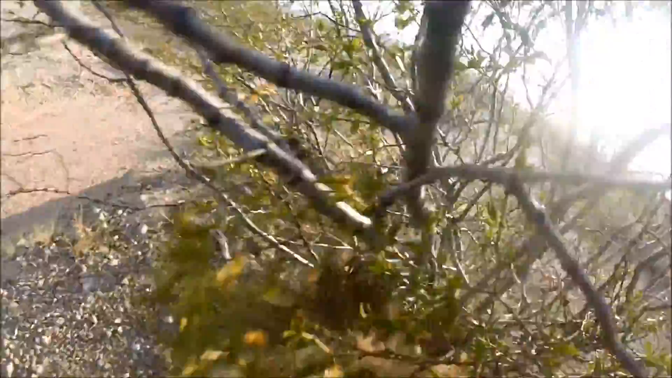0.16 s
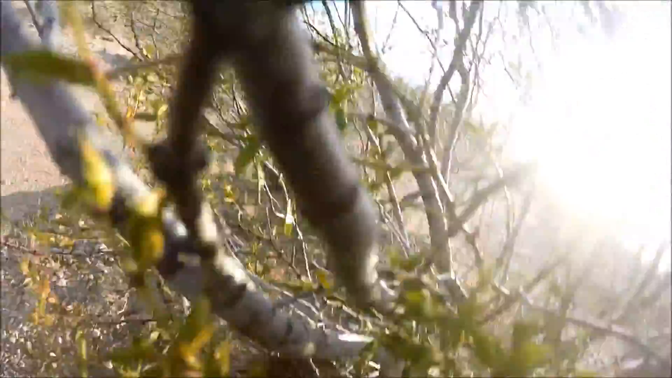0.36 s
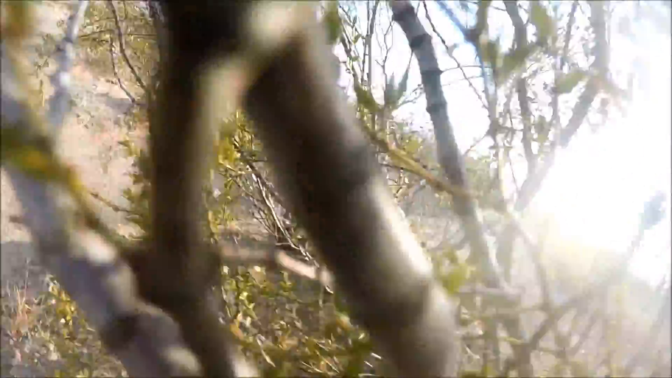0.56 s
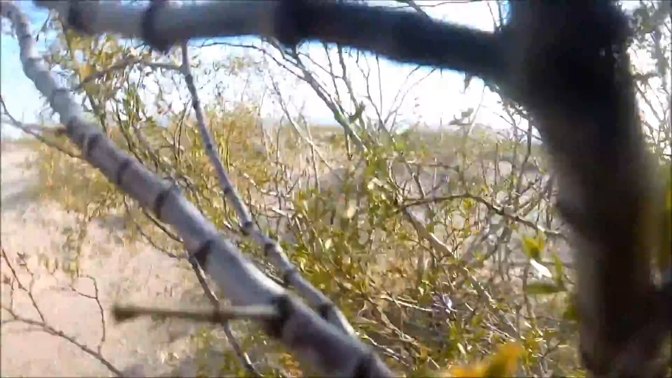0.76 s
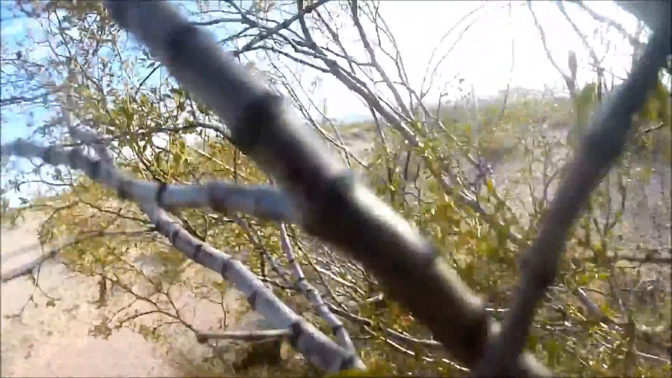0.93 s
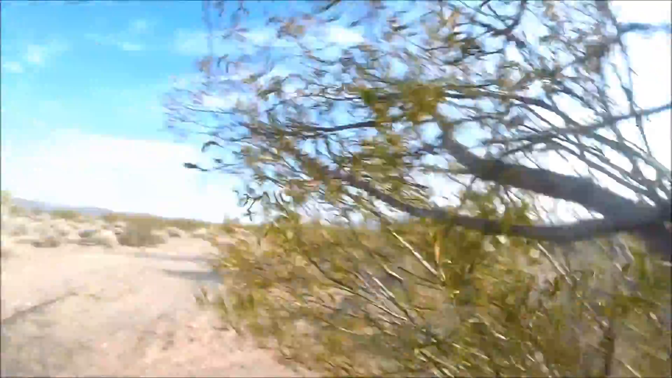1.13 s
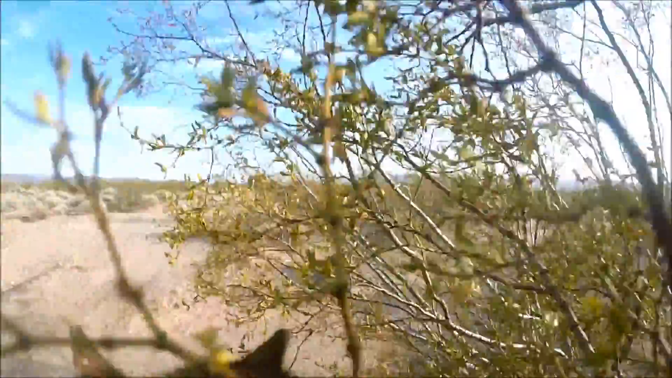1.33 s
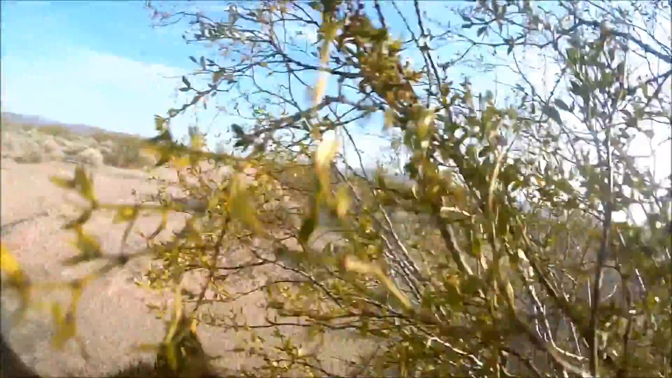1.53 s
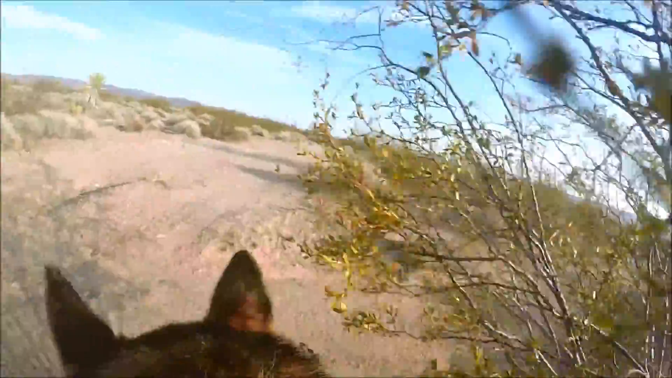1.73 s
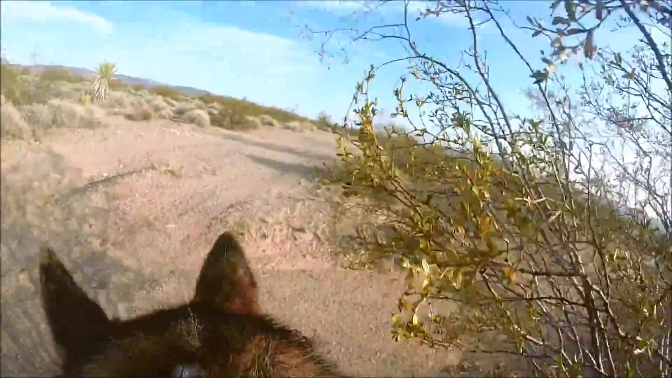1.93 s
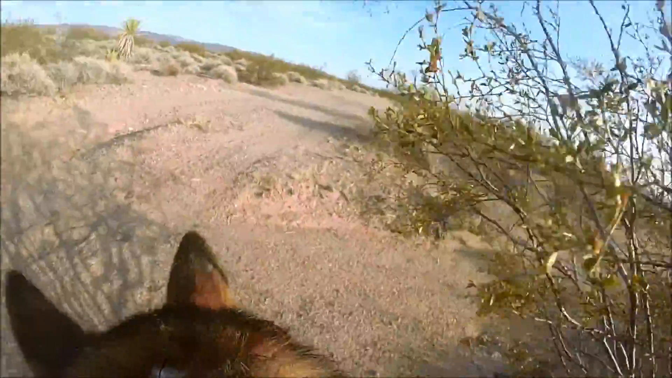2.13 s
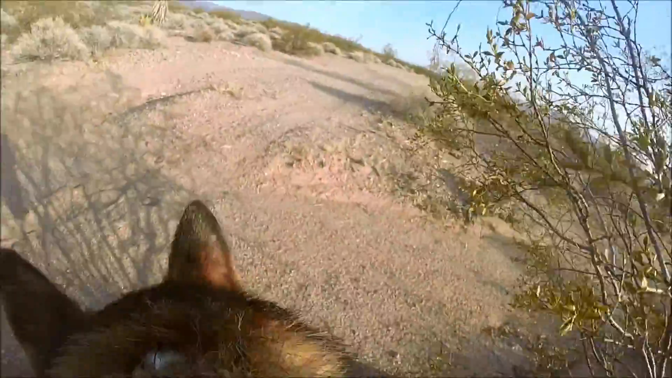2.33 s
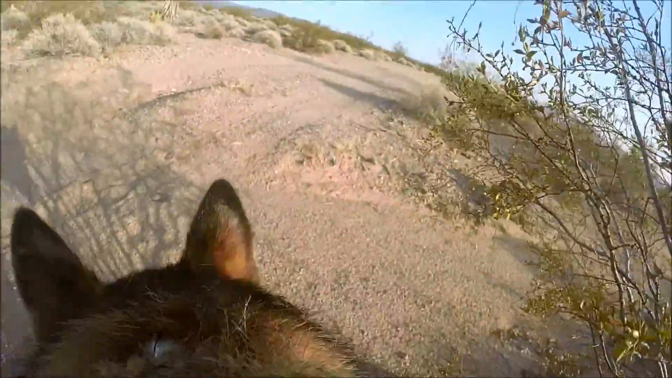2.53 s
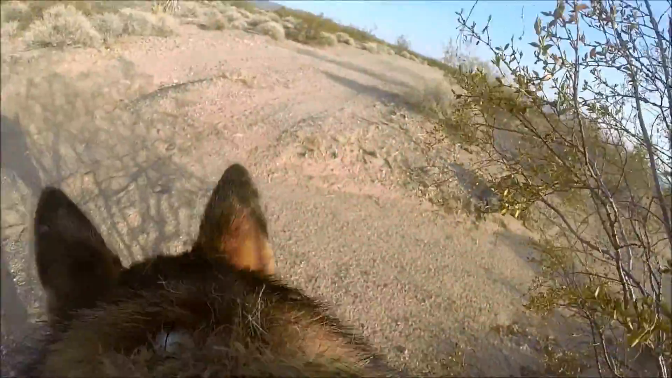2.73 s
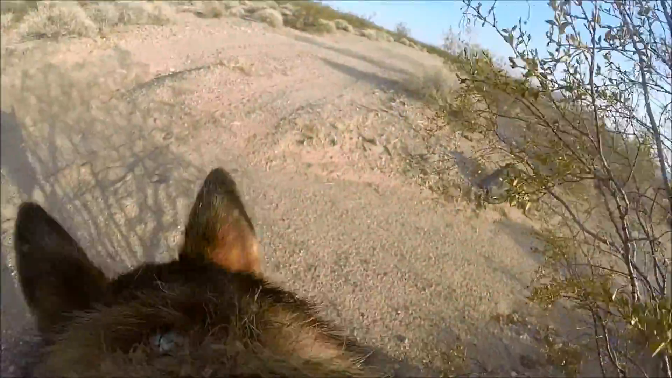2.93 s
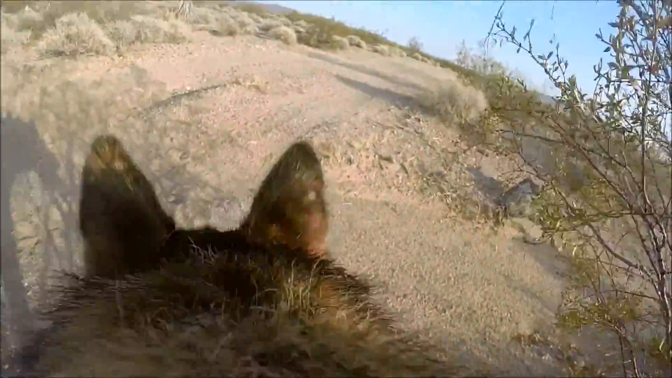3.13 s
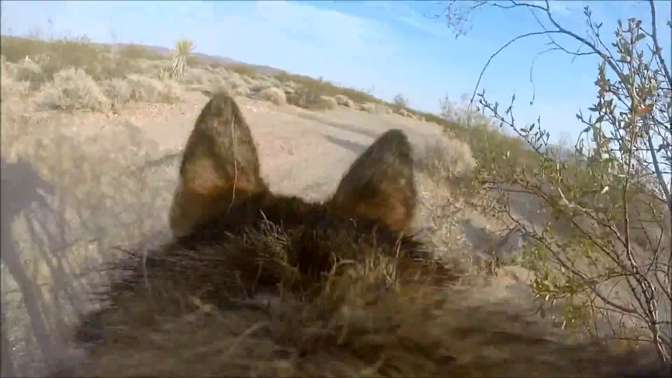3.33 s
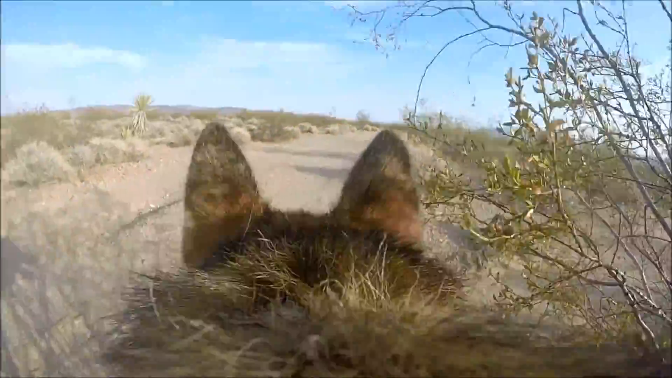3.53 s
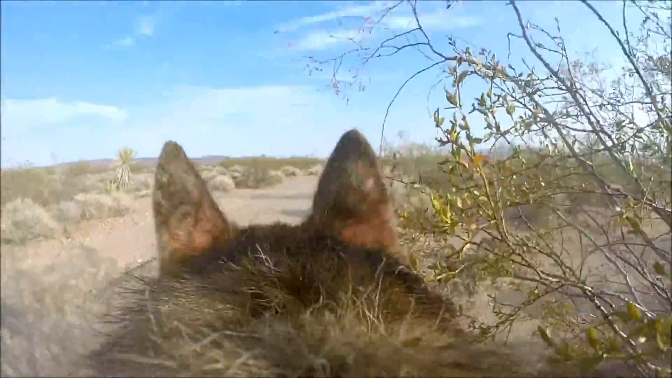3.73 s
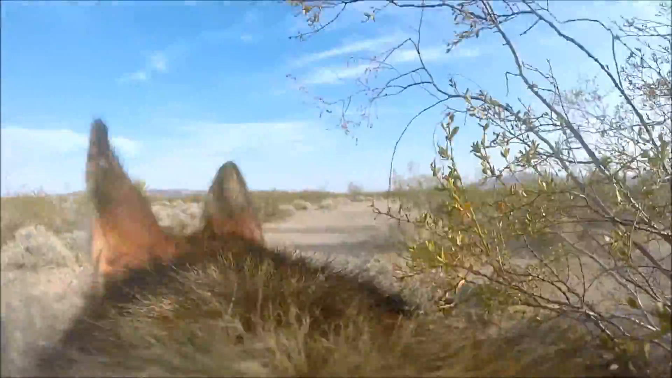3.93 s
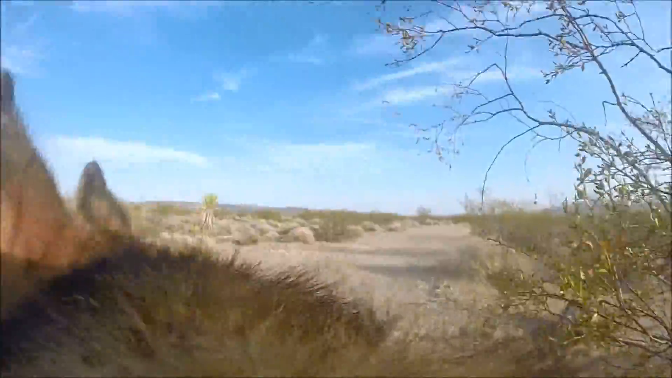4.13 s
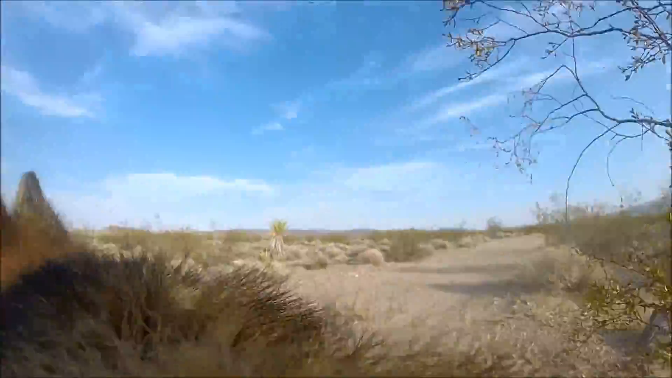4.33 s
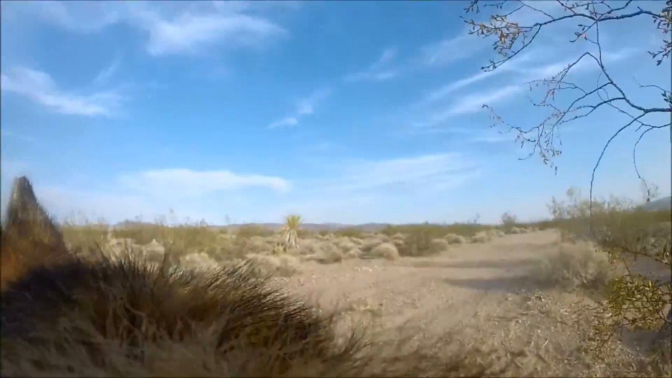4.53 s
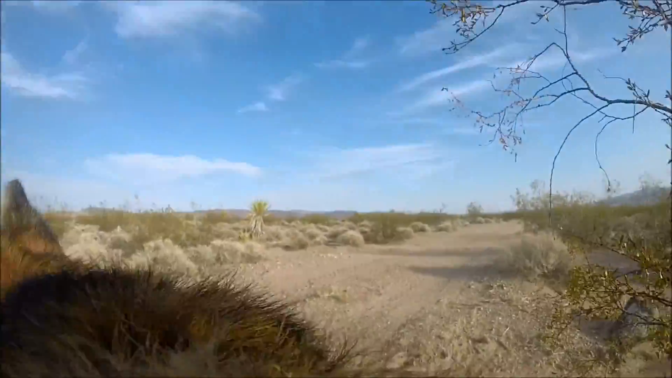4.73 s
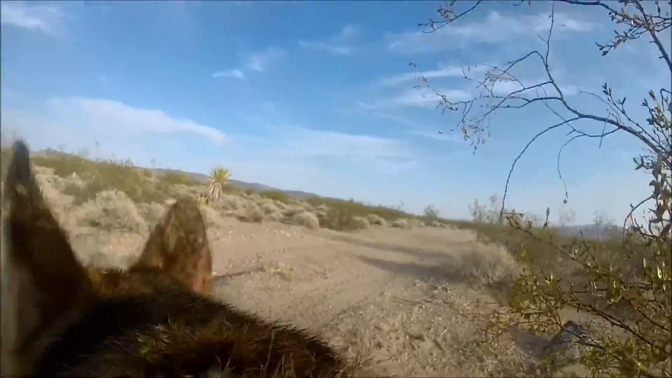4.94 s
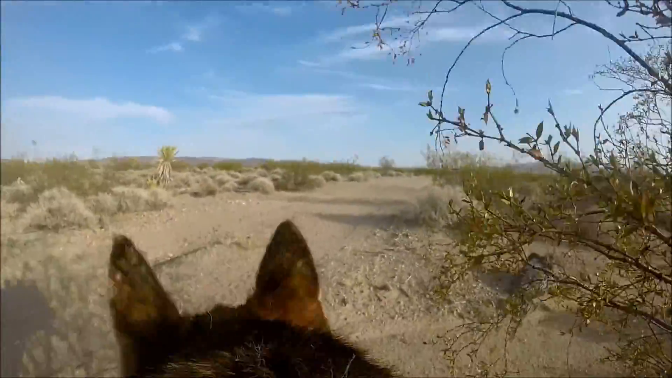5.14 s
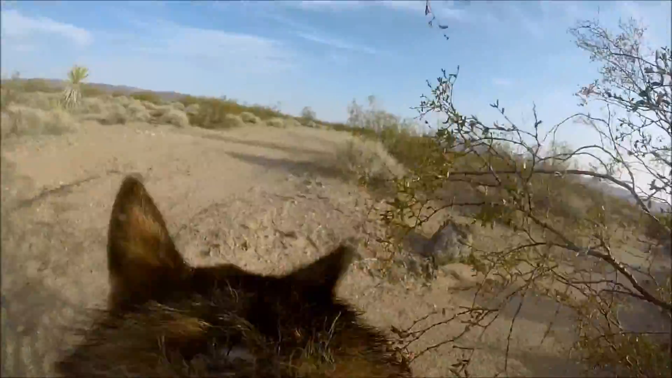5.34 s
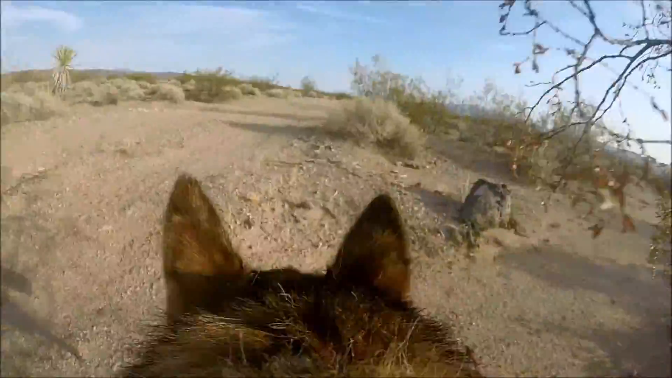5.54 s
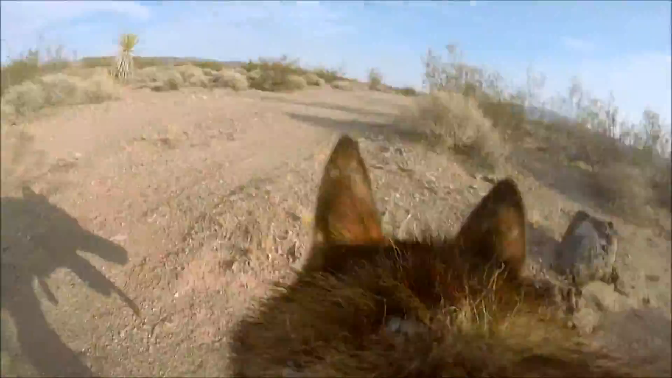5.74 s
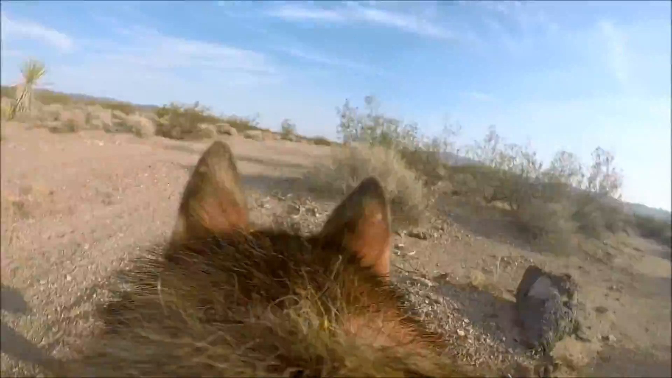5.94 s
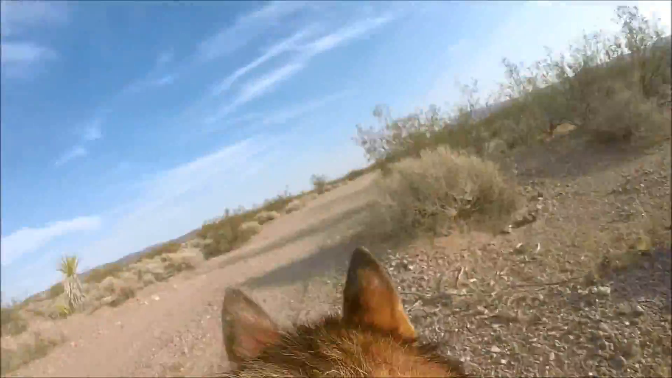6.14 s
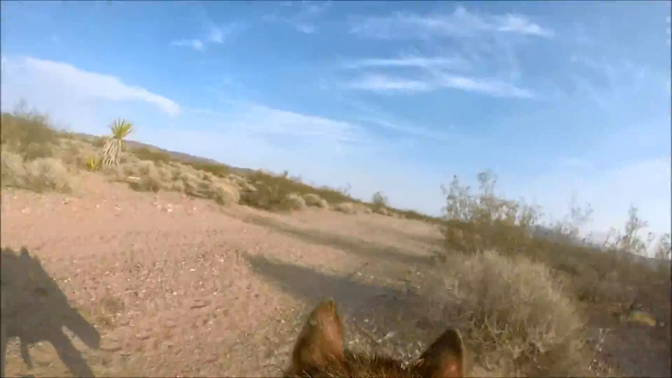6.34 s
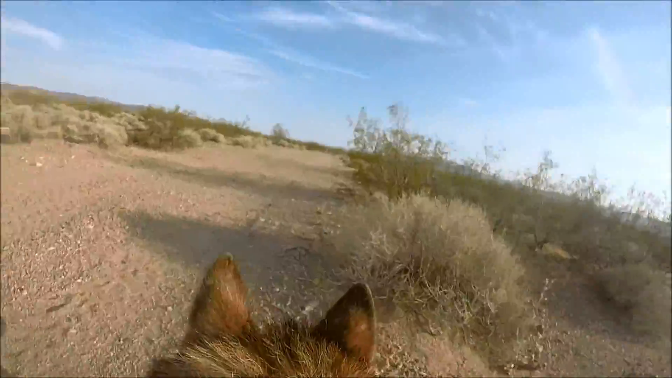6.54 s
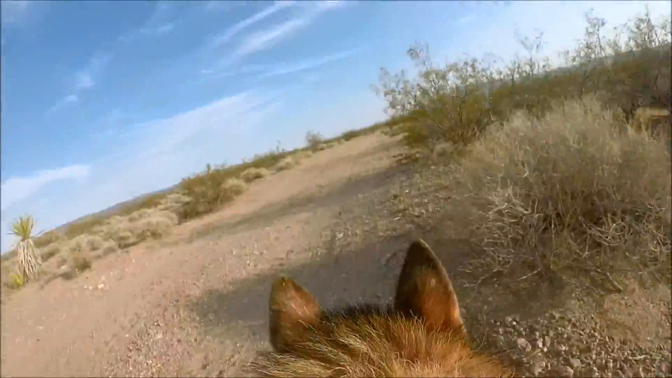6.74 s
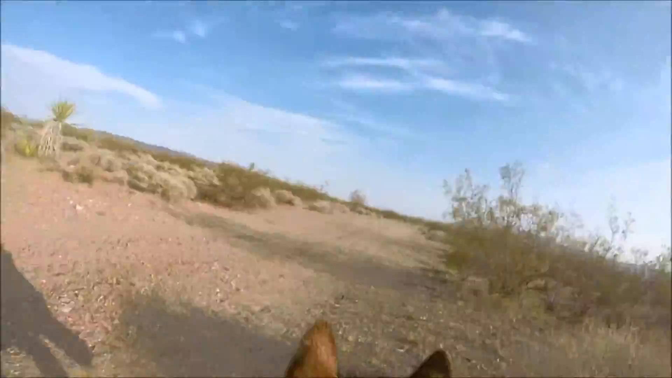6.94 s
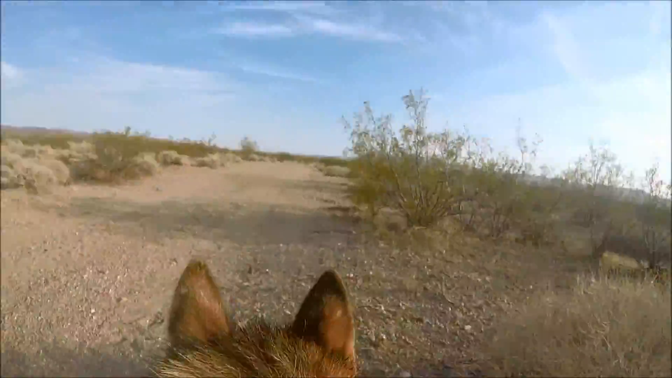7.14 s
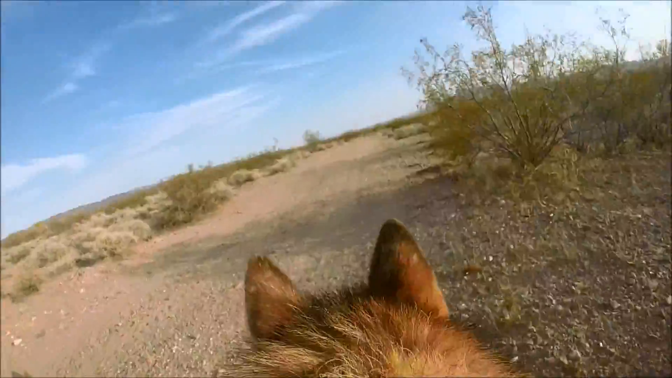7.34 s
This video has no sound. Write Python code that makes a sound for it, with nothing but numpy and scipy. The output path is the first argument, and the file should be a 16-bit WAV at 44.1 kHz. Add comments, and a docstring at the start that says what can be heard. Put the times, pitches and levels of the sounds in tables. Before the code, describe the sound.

Twigs scrape and snap loudly against a camera on a dog's back, then soft fur rustle, paw steps and hard knocks as it trots off.

```python
"""Desert bush from a dog's back

A dog carries a camera through a desert bush, then walks and finally trots off over gravel; all is heard
close, at the microphone in the housing. Twigs scrape and snap by stick-slip, leaves patter, freed twigs ring.
Hair clicks, straps, grit ticks and paw scuffs are coloured noise; the knocking mount rings in its own modes.
Swelling low rumble jostles the camera. A few more twigs scrape past late on."""
import sys
import numpy as np
from scipy import signal
from scipy.io import wavfile
from scipy.ndimage import uniform_filter1d

SR = 44100
rng = np.random.default_rng(int(sys.argv[2]) if len(sys.argv) > 2 else 0)


def digitize_waveform(pressure):
    """Quantize a signal to 16-bit integers and store it at the path in sys.argv[1].

    Rows of a 2-D input are taken as channels; values are limited to [-1, 1].
    """
    field = np.atleast_2d(pressure).T
    bounded = np.clip(field, -1, 1)
    quanta = np.round(bounded * 32767).astype(np.int16)
    wavfile.write(sys.argv[1], SR, quanta)


N = 329868  # length in samples

# Twigs dragged over the housing; levels are before each layer's trim, chatter is low for thick wood.
# Each row: start in seconds, end in seconds, scrape in dB, thud in dB, fizz in dB, chatter pitch in Hz.
TWIG_DRAGS = [(0.0, 0.067, -29, -33.5, -34.5, 1280), (0.056, 0.247, -35.5, -40.5, -48, 1290),
              (0.251, 0.293, -18.5, -29, -33, 2600), (0.298, 0.332, -19, -24, -32, 1200),
              (0.337, 0.378, -21.5, -28.5, -31, 2440), (0.382, 0.578, -30, -34, -41, 2470),
              (0.581, 0.762, -26.5, -30, -37.5, 2620), (0.764, 0.917, -27, -28, -40, 1270),
              (0.923, 1.051, -25.5, -27.5, -37.5, 2400), (1.063, 1.233, -22, -28.5, -29, 2400),
              (1.339, 1.428, -30.5, -34.5, -40, 2450), (1.413, 1.551, -28, -34, -46, 2500),
              (1.548, 1.65, -36.5, -32.5, -54.5, 2020), (1.686, 1.798, -38.5, -34, -59, 1330),
              (2.001, 2.091, -43.5, -59, -46, 2460), (5.192, 5.327, -29.5, -56, -34.5, 2760)]
# Colour of bark on the housing, before its resonances. Each row: frequency in Hz, density in dB per Hz.
BARK_TONE = [(59, -11), (100, 0), (343, -3.5), (502, -4.5), (662, -9.5), (910, -7), (1060, -3), (1520, 3.5),
             (2420, 5.5), (3620, -4), (4670, -12.5), (6420, -18), (7450, -21.5), (13500, -37), (16000, -54)]

# Three registers: thud, body and fizz
REGISTERS = [
    signal.butter(3, [120, 800], "band", fs=SR, output="sos"),
    signal.butter(3, [800, 4500], "band", fs=SR, output="sos"),
    signal.butter(3, 4500, "high", fs=SR, output="sos"),
]
GAIT_CHANGE_S = 0.11  # fade time into the open and into the trot


def gain_of(db):
    """Decibels to amplitude."""
    return 10 ** (np.asarray(db) / 20)


def evened(x):
    """Scales to rms 1."""
    return x / np.sqrt(np.mean(x ** 2) + 1e-20)


def steadied(x, seconds):
    """Scales to a running rms of about 1, keeping the finer grain."""
    size = max(int(seconds * SR), 2)
    power = uniform_filter1d(uniform_filter1d(x ** 2, size), size)
    return x / np.sqrt(abs(power) + 1e-12)


def add(mix, s, sound):
    """Adds a sound at time s."""
    part = mix[max(round(s * SR), 0):][:len(sound)]
    part += sound[:len(part)]


def drift(n, seconds):
    """Slow random curve between normal draws (deviation 1) spaced by the given time."""
    knots = np.arange(n) / (seconds * SR)
    return np.interp(knots, np.arange(4096), rng.standard_normal(4096))


def response(tone):
    """Minimum-phase impulse response of a spectrum with the housing's resonances added."""
    # Air and wall resonances of the housing. Each row: centre in Hz, width in Hz, lift in dB.
    housing = [(1200, 425, 7.5), (1740, 55, 5), (2314, 240, 4.5), (2900, 204, 5), (3340, 85, -7),
               (3680, 160, 1.5), (4690, 300, -7), (6210, 630, 3.5)]
    hz = np.fft.rfftfreq(4096, 1 / SR)
    f, db = np.transpose(tone)
    db = np.interp(np.log(hz + 1), np.log(f + 1), db)
    for centre, width, lift in housing:
        db = db + lift / (1 + (2 * (hz - centre) / width) ** 2)
    mirrored = np.r_[db, db[-2:0:-1]]
    log_gain = np.log(gain_of(np.maximum(mirrored, -100)))
    return np.fft.ifft(np.exp(np.conj(signal.hilbert(log_gain)))).real


def coloured(x, taps):
    """Passes x through an impulse response."""
    return signal.oaconvolve(x, taps)[:len(x)]


def resonate(x, hz, width):
    """A resonance of gain 1, width in Hz, that may follow a pitch curve."""
    turn = np.exp(2j * np.pi * np.cumsum(hz * np.ones(len(x))) / SR)
    r = np.exp(-np.pi * width / SR)
    # Shift the pitch down to 0 Hz, smooth there, and shift back
    smooth = signal.lfilter([1 - r], [1, -r], x / turn + 1e-18)
    return 2 * (turn * smooth).real


def registers(x):
    """Splits a sound into thud, body and fizz."""
    return [signal.sosfilt(band, x) for band in REGISTERS]


def slips(n, per_s, spread_db):
    """Tiny stick-slip clicks at random times, of either sign; the spread makes their sizes unequal."""
    size = gain_of(spread_db * np.minimum(rng.exponential(1, n), 4))
    return size * rng.choice([-1, 1], n) * (rng.random(n) < per_s / SR)


def blow(sound, peak_db, thud_db, tick_db):
    """Weights one blow: its body by peak, its thud and tick by rms."""
    thud, body, tick = registers(sound)
    weighted_body = gain_of(peak_db) * body / abs(body).max()
    return weighted_body + gain_of(thud_db) * evened(thud) + gain_of(tick_db) * evened(tick)


def patchy(x, depth_db, frames, bins):
    """Lets the colour shift at random as the points of contact move."""
    z = signal.stft(x, nperseg=512, noverlap=384)[2]
    field = rng.standard_normal(z.shape)
    field = uniform_filter1d(field, max(int(frames), 1), 1)
    field = uniform_filter1d(field, max(int(bins), 1), 0)
    shifted = z * gain_of(depth_db * evened(field))
    return signal.istft(shifted, nperseg=512, noverlap=384)[1][:len(x)]


def contact(start, end):
    """Envelope of something sliding past: it lands quickly, holds and slips off."""
    grab_s, slip_off_s = 0.0036, 0.006
    t = np.arange(N) / SR
    landing = np.clip((t - start) / grab_s + .5, 0, 1)
    return landing * np.exp(-np.clip((t - end) / slip_off_s, 0, 20))


def swells(rows, rise_s, fall_s):
    """Envelope that builds to each (s, dB) and dies away."""
    t = np.arange(N) / SR
    out = np.zeros(N)
    for s, db in rows:
        distance = np.maximum((s - t) / rise_s, (t - s) / fall_s)
        out += gain_of(db) * np.exp(-np.minimum(distance, 20))
    return out


def after(s, fade_s):
    """Fades from 0 to 1 around time s."""
    return np.clip((np.arange(N) / SR - s) / fade_s + .5, 0, 1)


def motion(follow, trot_db):
    """Gain of a layer that follows the effort by some dB per dB and changes at the trot."""
    # How hard the dog's shoulders work under the camera. Each row: time in seconds, effort in dB.
    effort_curve = [(1.9, -21), (2.2, -15.5), (2.55, -4.5), (2.88, -7), (3.33, 10), (3.57, -1.5),
                    (3.75, 4.5), (4.08, 13), (4.33, -1), (4.64, -10.5), (4.82, 3), (5.2, 7.5), (5.43, -8),
                    (5.62, -1.5), (6.35, 6), (6.76, -2), (7.08, 1.5), (7.48, -5)]
    trot_s = 5.9
    effort = np.interp(np.arange(N) / SR, *np.transpose(effort_curve))
    return gain_of(follow * effort + trot_db * after(trot_s, GAIT_CHANGE_S))


def scraping(scrape_db=2.5, thud_db=3, fizz_db=3, clump_db=2.5, press_db=2.5, thin_db=26, thin_hz=1900):
    """Bark stick-slips over the housing in clumps; the twig chatters at a pitch that wanders."""
    out, t = np.zeros(N), np.arange(N) / SR
    drive = slips(N, per_s=2400, spread_db=2.5) * gain_of(clump_db * drift(N, seconds=0.0054))
    rasp = patchy(coloured(drive, response(BARK_TONE)), depth_db=4, frames=8, bins=4)
    starts, *_, pitches = np.transpose(TWIG_DRAGS)
    chatter = pitches[np.maximum(np.searchsorted(starts, t) - 1, 0)]
    wander = np.exp(0.21 * drift(N, seconds=0.015))
    twig = resonate(rasp, chatter * wander, 540)
    bark = evened(rasp) + .7 * evened(twig)
    thud, body, fizz = (steadied(x, seconds=.04) for x in registers(bark))
    high_pass = signal.butter(2, thin_hz, "high", fs=SR, output="sos")
    wiry = steadied(signal.sosfiltfilt(high_pass, body), seconds=.04)
    for start, end, scrape, low, high, _ in TWIG_DRAGS:
        thin = np.clip((scrape - low) / thin_db, 0, 1)  # a twig too light to thud also rasps higher
        wood = thin * wiry + (1 - thin) * body
        drag = gain_of(scrape + scrape_db) * wood
        drag += gain_of(low + thud_db) * thud + gain_of(high + fizz_db) * fizz
        out += contact(start, end) * drag
    return out * gain_of(press_db * drift(N, seconds=.02))


def leaves(leaf_db=0):
    """Small dry leaves patter lightly as they brush past."""
    # Sprays of leaves. Each row: start in seconds, end in seconds, level in dB.
    sprays = [(0, 1.235, -43), (1.329, 1.533, -47), (1.53, 1.837, -53.5), (1.84, 1.95, -64),
              (1.949, 2.097, -54), (5.33, 5.38, -50)]
    # Colour of the patter, before the housing. Each row: frequency in Hz, density in dB per Hz.
    leaf_tone = [(300, -22), (1500, -5), (3600, 0), (6500, -5.5), (10000, -18.5), (15000, -24.5)]
    ticks = coloured(slips(N, per_s=600, spread_db=4), response(leaf_tone))
    envelope = sum(gain_of(db + leaf_db) * contact(start, end) for start, end, db in sprays)
    return envelope * evened(ticks)


def jostle(jolt_db=0, bump_db=-1, sway_db=-39, lurch_db=2.5, drag_db=-3):
    """Dragging branches shake and bump the camera; it sways with the gait and hard strides jolt it."""
    # Thick branches bumping the camera. Each row: time in seconds, level in dB before the trim.
    branch_bumps = [(0.37, -19.5), (0.7, -13), (1.074, -17), (1.136, -22), (1.524, -20.5), (1.614, -20.5),
                    (1.702, -26.5)]
    # Strides that jolt the camera. Each row: time in seconds, level in dB.
    jolts = [(2.43, -39), (2.6, -30.5), (3.23, -26), (3.5, -18), (3.82, -25.5), (4.82, -35), (4.99, -29),
             (5.555, -24.5), (5.82, -16), (6.1, -22), (6.35, -20), (6.45, -24), (6.67, -18), (6.955, -16.5),
             (7.24, -19.5)]
    # Rumble of bumps, then of strides, before the housing. Each row: frequency in Hz, density in dB per Hz.
    bump_tone = [(8.8, -39), (15, -11), (92, 1.5), (180, -19.5), (230, -22.5), (400, -120)]
    stride_tone = [(8.8, -43.5), (15, -7.5), (43, 4), (124, -13.5), (160, -28.5), (210, -46), (350, -120)]
    bumps, strides = (steadied(coloured(rng.standard_normal(N), response(tone)), seconds=0.044)
                      for tone in (bump_tone, stride_tone))
    dragged = sum(gain_of(thud + drag_db) * contact(start, end) for start, end, _, thud, _, _ in TWIG_DRAGS)
    bumped = gain_of(bump_db) * swells(branch_bumps, rise_s=0.02, fall_s=0.0095)
    sway = gain_of(sway_db + lurch_db * drift(N, seconds=.07)) * motion(follow=0.43, trot_db=5.5)
    jolted = gain_of(jolt_db) * swells(jolts, rise_s=0.032, fall_s=0.03)
    return np.hypot(dragged, bumped) * bumps + np.hypot(sway, jolted) * strides


def fur(fur_db=-44, flicker_db=3.0):
    """Thousands of hairs flick over the housing: a soft grainy hiss that follows the dog's shoulders."""
    # Colour of the hairs, before the housing. Each row: frequency in Hz, density in dB per Hz.
    fur_tone = [(290, -47), (500, -11.5), (855, -9.5), (1320, -5), (1840, -4.5), (2330, -4.5),
                (2980, -10.5), (3290, -19), (3650, -15), (4660, -18.5), (6230, -21.5), (7000, -36.5),
                (11500, -45), (14200, -61.5), (16000, -67)]
    hairs = slips(N, per_s=7900, spread_db=0.0) * gain_of(flicker_db * drift(N, seconds=0.015))
    hiss = patchy(coloured(hairs, response(fur_tone)), depth_db=2.2, frames=9, bins=4)
    return gain_of(fur_db) * motion(follow=0.92, trot_db=-0.36) * evened(hiss)


def harness(shift_db=-44, lump_db=4):
    """Straps shift in dull lumps and now and then squeak, and leaves brush past once: noise through two
    resonances at one pitch."""
    # Colour of shifting straps, before the housing. Each row: frequency in Hz, density in dB per Hz.
    strap_tone = [(59, -27.5), (100, 4.5), (178, 1.5), (456, -9), (652, -10.5), (836, -47), (900, -35),
                  (1170, -52.5), (1980, -120)]
    # Brief squeaks, led by two swishes of leaves brushing past. Each row: middle in seconds, level in dB, pitch
    # in Hz, length in seconds.
    squeaks = [(2.591, -35, 2300, 0.029), (2.57, -46.5, 4100, 0.035), (3.762, -24.5, 2380, 0.0045),
               (3.841, -26, 2610, 0.013), (3.938, -30, 1420, 0.023), (4.004, -19.5, 1710, 0.0075),
               (4.028, -24, 2400, .011), (4.068, -22.5, 1330, 0.035), (5.104, -18, 1354, 0.0092)]
    lumps = slips(N, per_s=460, spread_db=3.5) * gain_of(lump_db * drift(N, seconds=0.017))
    straps = steadied(coloured(lumps, response(strap_tone)), seconds=0.072)
    out = gain_of(shift_db) * motion(follow=0.62, trot_db=-0.2) * straps
    t = np.arange(-2048, 2048) / SR
    for s, db, hz, length in squeaks:
        squeak = resonate(rng.standard_normal(len(t)), hz, 0.13 * hz)
        squeak = steadied(resonate(squeak, hz, 0.34 * hz), seconds=0.0091)
        add(out, s + t[0], gain_of(db) * squeak * np.exp(-(2 * t / length) ** 2))
    return out


def gravel(crunch_db=-4, settle_s=0.0049, loose_db=-56):
    """Paws set a few grains of grit clicking; loose grains keep ticking in between."""
    # Colour of one grain, before the housing. Each row: frequency in Hz, density in dB per Hz.
    grit_tone = [(300, -20), (1500, 1.5), (3000, 7), (6000, -11), (9000, -14.5), (14000, -43.5)]
    # Grit crunching under a paw. Each row: time in seconds, peak of the fizz in dB before the trim.
    crunches = [(2.353, -40), (2.568, -38), (3.018, -40), (4.411, -42), (4.959, -38), (5.511, -38),
                (5.555, -22), (5.767, -27), (5.934, -38), (6.064, -36), (6.19, -36), (6.394, -34),
                (6.553, -40), (6.899, -40), (7.006, -31.5)]
    t, taps = np.arange(4096) / SR, response(grit_tone)
    loose = coloured(slips(N, per_s=150, spread_db=4), taps)
    out = gain_of(loose_db) * motion(follow=0.73, trot_db=-5.0) * evened(loose)
    for s, db in crunches:
        grains = slips(len(t), per_s=2000, spread_db=2) * np.exp(-t / settle_s)
        grit = coloured(grains, taps)
        add(out, s, gain_of(db + crunch_db) * grit / abs(registers(grit)[2]).max())
    return out


def lesser_snaps():
    """Small side twigs catch at random during every drag, louder where its scrape, thud and fizz are."""
    per_s, spread_db, decay_ms = 18, 2, 3.8
    above_scrape_db, above_thud_db, above_fizz_db = 9.5, -6.5, 9  # before the trims of snapping()
    rows = []
    for start, end, scrape, thud, fizz, hz in TWIG_DRAGS:
        waits = np.cumsum(rng.exponential(1, size=12)) / per_s
        sizes, pitches = rng.standard_normal(size=(2, 12))
        for wait, size, pitch in zip(waits, sizes, pitches):
            if start + wait < end:
                db = spread_db * np.clip(size, -2, 1)
                rows.append((start + wait, scrape + above_scrape_db + db, hz * np.exp(.2 * pitch),
                             thud + above_thud_db + db, fizz + above_fizz_db + db, decay_ms))
    return rows


def snapping(snap_db=-1, thud_db=-5, crack_db=-5, ring=0.62, first_slip=2.44, lag_s=0.001476,
             rise_share=0.24, thinness=0.48):
    """A twig starts to skid, lets go with one hard click and rings briefly at its own pitch."""
    # The loudest twigs striking the housing, levels before the trims. Each row: time in seconds before
    # the lag, peak in dB, twig pitch in Hz, thud in dB, crack in dB, decay in ms.
    loud_snaps = [(0.018, -6, 985, -54, -26, 5.9), (0.039, -9, 3430, -33, -18, 2.2),
                  (0.113, -26, 2960, -52, -32, 1.8), (0.165, -5.5, 1470, -20, -22.5, 11),
                  (0.195, -4.5, 3080, -24.5, -27, 2.6), (0.222, -9, 1200, -22.5, -20.5, 3.1),
                  (0.249, -2, 2000, -21, -26.5, 3.4), (0.265, -2, 2740, -19, -26, 4.6),
                  (0.298, -10, 1210, -21, -44, 4), (0.322, -4, 1080, -12.5, -32, 11),
                  (0.352, -10, 2420, -34, -20, 3.2), (0.372, -5, 1750, -41, -18, 3),
                  (0.446, 3, 2550, -40, -26, 4), (0.465, -11, 1740, -48, -30, 3.3),
                  (0.596, -2.5, 6200, -18, -22, 5.5), (0.606, -2.5, 2400, -19.5, -15.5, 5.1),
                  (0.649, -2, 2080, -22.5, -37, 5.9), (0.704, 6.5, 1820, -15.5, -29, 2.1),
                  (0.738, -5, 2700, -46, -19, 13), (0.932, -2, 2800, -22.5, -22.5, 4.9),
                  (0.955, -5, 2250, -27, -37, 2.8), (1.019, -4.5, 2900, -30, -19, 6.9),
                  (1.065, 5, 2020, -15, -17.5, 2.3), (1.074, -8, 1120, -16, -29, 3.1),
                  (1.1, 2, 2194, -19.5, -19.5, 4.1), (1.133, -4.5, 1340, -15, -30, 6.8),
                  (1.158, 2, 1350, -14.5, -18, 7.2), (1.171, 1, 2100, -17.5, -18.5, 5),
                  (1.226, -2.5, 1990, -25, -26.5, 3.8), (1.234, -2, 2880, -29, -30, 1.3),
                  (1.338, -19, 2250, -38, -28, 1.2), (1.357, -12, 1740, -35, -36.5, 5.3),
                  (1.424, -7.5, 1760, -29, -44, 7.9), (1.445, 1, 1940, -38, -41, 0.96),
                  (1.473, -2, 2260, -28, -18, 10.5), (1.491, -2, 2400, -48, -24, 1.9),
                  (1.5, -0.5, 3000, -38, -14.5, 3), (1.511, -4.5, 2370, -27, -27, 11),
                  (1.578, -13.5, 1110, -50, -34.5, 2), (1.609, -15.5, 1460, -47, -43, 4.6),
                  (1.698, -16, 1190, -29.5, -35, 7.5), (1.768, -17, 1630, -23, -56, 2.4),
                  (1.798, -17.5, 2540, -38, -32, 8), (1.826, -31, 3850, -50, -35.5, 1),
                  (1.86, -26, 3660, -49, -40, 2.1), (1.878, -25.5, 2130, -56, -52, 3.2),
                  (1.909, -42, 3800, -63, -53, 3.6), (2.004, -20.5, 2710, -44.5, -32.5, 7.2),
                  (2.05, -10.5, 2300, -45, -32, 4), (2.067, -16, 3700, -53, -25, 2.5),
                  (2.077, -7.5, 3680, -54, -20, 2), (5.145, -3.5, 2760, -31, -26.5, 2.3),
                  (5.157, -5.5, 3620, -32, -17, 2.1), (5.171, -27, 4100, -55, -20.5, 4.1),
                  (5.19, -23, 2800, -35.5, -17, 3.2), (5.199, -6, 2900, -50, -24, 7.7),
                  (5.216, -10, 2270, -46, -22, 6.5), (5.239, -1, 2900, -38, -26, 8.5),
                  (5.26, -6, 2780, -31, -19, 11.4), (5.292, -30, 2920, -41, -17, 2.3),
                  (5.311, -7, 6500, -48, -15.5, 2)]
    out, t, taps = np.zeros(N), np.arange(-256, 1792) / SR, response(BARK_TONE)
    for s, peak, hz, thud, crack, decay_ms in loud_snaps + lesser_snaps():
        decay = max(decay_ms, .5) / 1e3
        grip = np.exp(np.minimum(t / (rise_share * decay), -t / decay))  # long skids also build more slowly
        skid = evened(slips(len(t), per_s=6500, spread_db=5.5)) * grip + first_slip * (t == 0)
        click = coloured(skid, taps)
        thin = np.clip((peak - thud) / 40, 0, .9)
        click = click - thin * resonate(click, thinness * hz, 1000)  # a thin twig is weak below its pitch
        overtone_hz = min(hz * rng.uniform(2.2, 3), SR / 3)
        tone = resonate(click, hz, 330) + resonate(click, overtone_hz, 330)
        snap = evened(click) + ring * evened(tone)
        add(out, s + lag_s + t[0], blow(snap, peak + snap_db, thud + thud_db, crack + crack_db))
    return out


def twanging():
    """A freed twig rings in its bending modes, each a decaying sine."""
    # Twigs that spring free. Each row: time in seconds, strength in dB.
    twangs = [(1.236, -33.5), (2.054, -40)]
    # Bending modes. Each row: frequency in Hz, relative level in dB, time to fall by 60 dB in seconds.
    bending_modes = [(1803, 0, 0.31), (2980, -13, 0.24), (3600, -16, 0.1), (6379, -13, 0.069)]
    out, t = np.zeros(N), np.arange(SR // 3) / SR
    for s, strength_db in twangs:
        add(out, s, sum(gain_of(strength_db + db - 60 * t / t60) * np.sin(2 * np.pi * hz * t)
                        for hz, db, t60 in bending_modes))
    return out


def sheen(sheen_db=-68, clear_s=1.6):
    """Out in the open the finest hairs keep up a faint sizzle of filtered noise."""
    # Colour of the finest hairs, before the housing. Each row: frequency in Hz, density in dB per Hz.
    sheen_tone = [(1000, -19), (3000, 3.5), (8500, 2), (12000, -9.5), (15000, -17)]
    sizzle = evened(coloured(rng.standard_normal(N), response(sheen_tone)))
    return gain_of(sheen_db) * after(clear_s, GAIT_CHANGE_S) * motion(follow=0.49, trot_db=0.5) * sizzle


def knocking(knock_db=0, thud_db=-3, favour_db=8, ring=0.32, rattle_s=0.006, rebound=0.37,
             rebound_s=0.00256, lag_s=0.00196):
    """The mount clacks against its stop, rebounds and rattles; the point of contact favours some modes."""
    # Each row: time in seconds before the lag, peak in dB, strongest ring in Hz, thud in dB before the trim.
    knocks = [(2.128, -15, 1250, -31), (2.149, -26.5, 1570, -47), (2.507, -16, 1710, -53),
              (2.904, -30, 1260, -44), (3.117, -22, 1140, -44), (4.248, -14.5, 1640, -46),
              (4.41, -21, 1260, -51), (4.463, -21.5, 1100, -45), (4.511, -22, 1110, -42),
              (4.545, -25.5, 1710, -60), (4.764, -13, 1140, -32.5), (4.796, -18, 1100, -46),
              (5.43, -12.5, 1480, -36.5), (5.555, -14, 1980, -40), (5.77, -12.5, 1300, -41),
              (5.83, -15, 1260, -32.5), (5.988, 1, 1510, -29), (6.185, -19, 1090, -37),
              (6.312, -18, 1080, -34.5), (6.341, -22.5, 1460, -40), (6.378, -18.5, 1130, -38),
              (6.555, -16, 1200, -44), (6.672, -0.5, 1430, -23), (6.795, -16.5, 1210, -40),
              (6.886, -9.5, 1080, -32), (6.941, -21.5, 1340, -41.5), (7.251, -1, 1550, -21.5),
              (7.344, -13.5, 1370, -36), (7.461, -3.5, 1210, -32)]
    # The mount's modes before lifts and detuning. Each row: frequency in Hz, relative level in dB,
    # time to fall by 60 dB in seconds.
    mount_modes = [(201, -10.5, 0.049), (447, 0, 0.033), (660, -5, 0.047), (1080, 8.5, 0.047),
                   (1470, 8.5, 0.015), (1760, 8, 0.0091), (2400, -9, 0.0063), (2900, -6, 0.013),
                   (3380, -29, 0.023), (3810, 0, 0.013), (5140, -12, 0.02), (5760, -22, 0.007),
                   (8330, -32, 0.0027)]
    # The dry clack, before the housing. Each row: frequency in Hz, density in dB per Hz.
    clack_tone = [(60, 6), (190, 8.5), (370, -2.5), (660, 3), (880, -12), (1400, -5), (2950, -8.5),
                  (3400, -18.5), (5300, -29.5), (7000, -37.5), (15000, -84)]
    hard_ring_hz, hard_ring_db = 2900, 8.5  # the harder the knock, the more it wakes the stiff high modes
    full_tick_db, tick_growth = -52.5, .55  # tick of a full-scale knock, its dB per dB of peak
    rattle = 0.041  # noise level beside a first hit of 1
    out, t, clack = np.zeros(N), np.arange(4096) / SR, evened(response(clack_tone))
    for s, peak, main_hz, thud in knocks:
        modes = np.zeros(len(t))
        for hz, db, t60 in mount_modes:
            lift_db = favour_db * np.exp(-(np.log(hz / main_hz) / .2) ** 2)
            lift_db += hard_ring_db * gain_of(peak) ** 2 * np.exp(-(np.log(hz / hard_ring_hz) / .2) ** 2)
            mode_hz = hz * (1 + 0.019 * rng.standard_normal())
            modes += gain_of(db + lift_db - 60 * t / t60) * np.sin(2 * np.pi * mode_hz * t)
        hits = rattle * rng.standard_normal(len(t)) * np.exp(-t / rattle_s)
        hits[0] += 1
        hits[int(rebound_s * rng.uniform(.7, 1.3) * SR)] += rebound
        knock = coloured(hits, clack + ring * evened(modes))
        add(out, s + lag_s, blow(knock, peak + knock_db, thud + thud_db, full_tick_db + tick_growth * peak))
    return out


def stepping(thump_db=-3, scuff_db=-5, grain_db=-17, lag_s=.008):
    """A padded paw lands and rolls: a soft thump under a short scuff of sand."""
    # Paws felt through the dog's body, levels before the trims. Each row: time in seconds before the lag,
    # thump in dB, scuff in dB, length in seconds.
    steps = [(2.34, -59, -35, 0.0093), (2.446, -39, -43, 0.011), (2.608, -36, -39.5, 0.026),
             (2.911, -34, -30, 0.01), (3.116, -27.5, -30.5, 0.018), (3.192, -24, -38, 0.0086),
             (3.344, -31.5, -44, 0.017), (3.462, -27, -24.5, 0.034), (3.699, -33, -28.5, 0.021),
             (4.186, -25.5, -24.5, 0.018), (4.288, -25, -34, 0.018), (5.51, -35, -31.5, 0.012),
             (5.752, -27, -28, 0.023), (6.194, -27.5, -33, 0.029), (6.336, -29.5, -34, 0.04),
             (6.381, -46, -30, 0.019), (6.522, -33, -34, 0.1), (6.773, -26, -31.5, 0.023),
             (6.901, -26, -31.5, 0.012), (6.988, -31, -34, 0.033), (7.116, -38, -37.5, 0.08),
             (7.231, -26.5, -25.5, 0.021)]
    # Colour of a step, before the housing. Each row: frequency in Hz, density in dB per Hz.
    step_tone = [(60, -12), (160, 12.5), (300, 2.5), (600, -13), (1200, -3.5), (2400, -6), (4200, -21.5),
                 (6500, -40), (14000, -62)]
    out, t, taps = np.zeros(N), np.arange(-2048, 4096) / SR, response(step_tone)
    for s, thump, scuff, length in steps:
        sand = coloured(slips(len(t), per_s=930, spread_db=4.0), taps)
        low, body, fizz = (steadied(x, seconds=0.011) for x in registers(sand))
        weight = np.exp(-(np.where(t < 0, 2 * t, t) / length) ** 2)  # lands faster than it lifts
        step = gain_of(thump + thump_db) * low
        step += gain_of(scuff + scuff_db) * body + gain_of(scuff + grain_db) * fizz
        add(out, s + lag_s + t[0], weight * step)
    return out


def scene():
    """Everything touches or lies close to the housing; the open desert gives no echo."""
    bush = scraping() + leaves() + snapping() + twanging()
    dog = jostle() + fur() + harness() + gravel() + sheen() + knocking() + stepping()
    return (bush + dog)[None]


def record(dry):
    """The hardest blows overload softly; then a low-pass limits the band."""
    edge_hz = 15600
    limited = dry / (1 + dry ** 6) ** (1 / 6)
    low_pass = signal.firwin(255, edge_hz, window=("kaiser", 8), fs=SR)
    return signal.oaconvolve(limited, low_pass[None], "same")


dry = scene()
out = record(dry)
digitize_waveform(out)
```